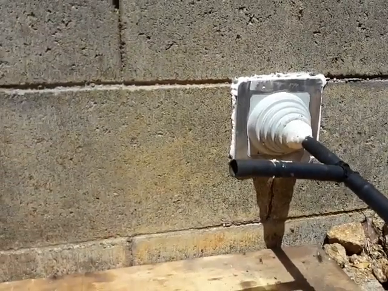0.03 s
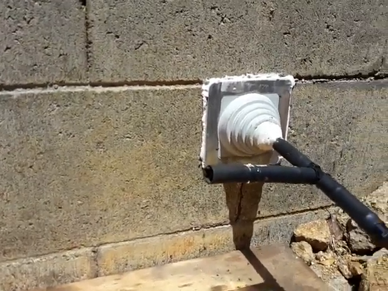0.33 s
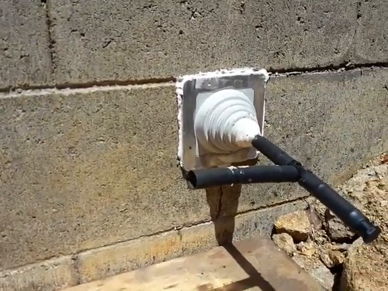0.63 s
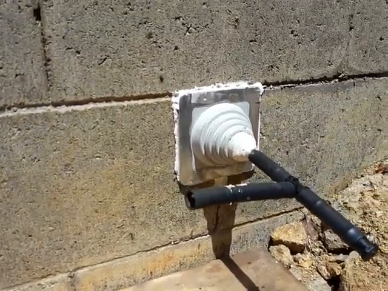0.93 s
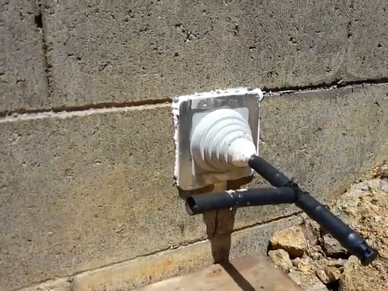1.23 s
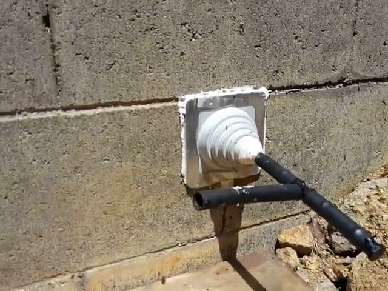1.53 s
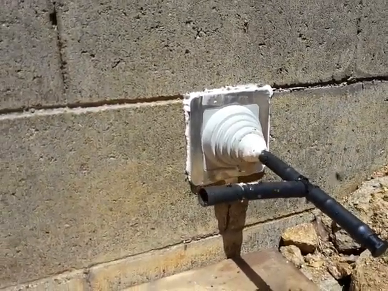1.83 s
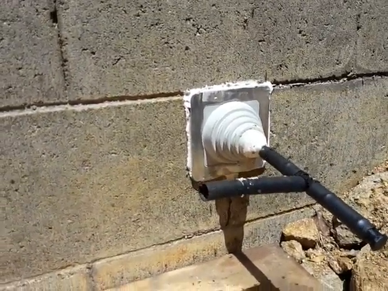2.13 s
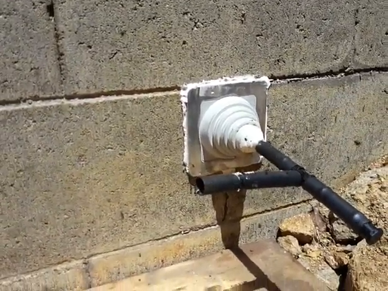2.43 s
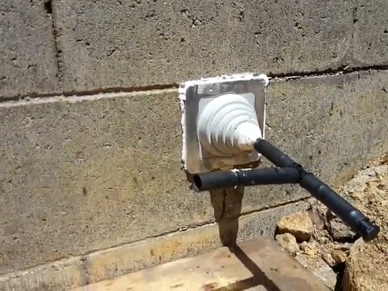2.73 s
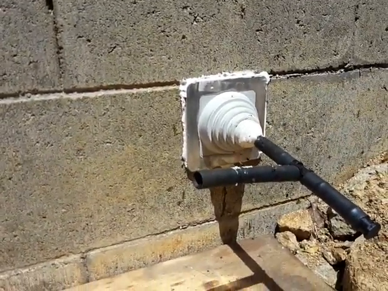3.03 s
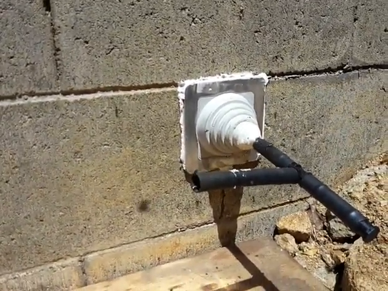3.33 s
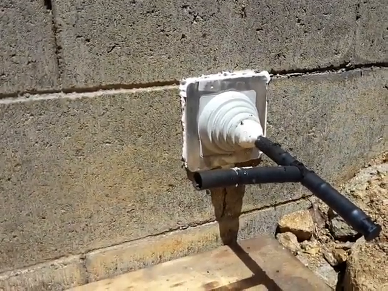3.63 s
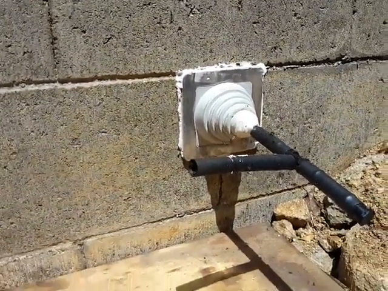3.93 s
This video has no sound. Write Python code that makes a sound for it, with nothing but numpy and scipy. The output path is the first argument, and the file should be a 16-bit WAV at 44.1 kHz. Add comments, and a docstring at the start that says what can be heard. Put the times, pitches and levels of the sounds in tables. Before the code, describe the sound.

Wind buffets a hand-held microphone outdoors, with low thumps on the right, strongest until 1.4 seconds. Dull handling knocks come at 0.2 seconds and between 1.2 and 2.3. A faint distant engine rises in pitch, loudest near 2.5. A small bee buzzes softly past on the right from 2.6 to 3.2. The wind dies down, and a sharp knock lands at 3.9. Faint hiss and low hum continue throughout.

```python
"""Stingless bees hover at a pipe in an outdoor wall, heard on a hand-held camera.
From the start, wind buffets the ports and handling knocks the case. Near 2.5 s a distant engine,
gathering speed, is at its loudest. One bee then weaves close to the right port and moves off by 3.2 s.
The wind dies down; at 3.9 s come the sharpest knock and a handling bump on the left.
Throughout: outdoor air, mains hum, a thin whine and the recorder's hiss."""
import sys
import numpy as np
from scipy import signal
from scipy.fft import rfft, irfft
from scipy.io import wavfile
from scipy.ndimage import uniform_filter1d

SR = 44100
rng = np.random.default_rng(int(sys.argv[2]) if len(sys.argv) > 2 else 0)


def master_out(mix):
    """Clip the mix to full scale and print it as 16-bit PCM to the path in sys.argv[1]."""
    frames = np.transpose(np.atleast_2d(mix))
    ceiling = np.clip(frames, -1, 1)
    pcm = np.round(ceiling * 32767).astype(np.int16)
    wavfile.write(sys.argv[1], SR, pcm)


N = 176400
TIME_S = np.arange(N) / SR

# Near bee. Each row: time in seconds, wingbeat in Hz, level in dB.
BEE_FLIGHT = [(2.54, 212, -70), (2.615, 239, -52), (2.665, 250, -47.5), (2.705, 237, -50),
              (2.737, 213, -54), (2.795, 239, -47), (2.86, 223, -57), (2.885, 243, -55), (2.92, 251, -49),
              (2.95, 230, -49), (3.01, 211, -52.5), (3.06, 232, -52), (3.09, 230, -53), (3.125, 249, -52),
              (3.18, 231, -56), (3.225, 228, -71)]
# Brightness as the bee turns. Each row: time in seconds, lift of its octave in dB.
BEE_OCTAVE_LIFT = [(2.68, -6.5), (2.81, -2), (2.88, -3), (2.96, 1.5), (3.05, -.5), (3.17, 8)]
# Wing tone. Each row: frequency in Hz, gain in dB.
WING_SPECTRUM = [(230, 0), (470, -5), (720, -10.5), (960, -17), (1200, -18), (1500, -25), (2500, -35),
                 (5000, -31)]
# Bees hovering at the entrance. Each row: wingbeat in Hz, level in dB.
HOVERING_BEES = [(240.4, -77.5), (230.8, -70.5)]

# Turbulence at the left and right ports. Each row: time in seconds, level in dB.
WIND_LEFT_LEVEL = [(0, -54), (.3, -45.5), (.65, -51), (1.3, -77), (1.7, -47.5), (2.3, -44.5), (2.7, -47),
                   (4, -63)]
WIND_RIGHT_LEVEL = [(0, -44), (.15, -30.5), (.24, -35), (.5, -33), (.65, -41), (.85, -34), (1.0, -33),
                    (1.15, -35.5), (1.35, -36), (1.5, -45), (1.95, -38.5), (2.05, -43), (2.32, -35.5),
                    (2.43, -44), (2.8, -44), (3.32, -49), (3.6, -62)]
# Turbulence. Each row: frequency in Hz, relative density in dB.
WIND_SPECTRUM = [(20, -37), (45, -3.5), (70, 4.5), (100, 5), (150, -2.5), (220, -10), (320, -21),
                 (600, -33.5), (1500, -53.5)]
# Low thumps at the ports: wind eddies on the right, then one handling bump on the left at 3.9 s.
# Each row: centre in seconds, level in dB, frequency in Hz, half length in cycles, port.
PORT_THUMPS = [(0.087, -19, 143, 0.64, "R"), (0.13, -14, 152, 0.47, "R"), (0.174, -15, 132, 0.52, "R"),
               (.195, -17, 166, 1.3, "R"), (0.274, -21.5, 128, 0.87, "R"), (0.426, -26, 103, 3.1, "R"),
               (.469, -14, 125, 0.44, "R"), (0.492, -22, 167, 0.58, "R"), (0.555, -16, 187, 0.68, "R"),
               (.598, -17, 137, 0.63, "R"), (.732, -22.5, 109, 0.63, "R"), (0.858, -24, 155, 1.2, "R"),
               (.909, -19, 154, .6, "R"), (0.931, -19, 123, 0.96, "R"), (0.982, -18.5, 107, 1.37, "R"),
               (1.019, -25, 180, 3.1, "R"), (1.066, -22.5, 148, 1.5, "R"), (1.121, -17.5, 92, 0.79, "R"),
               (1.186, -18, 122, 0.63, "R"), (1.331, -20.5, 121, 0.5, "R"), (1.412, -16.5, 149, .6, "R"),
               (1.81, -26.5, 128, 0.46, "R"), (1.86, -21.5, 139, 1.22, "R"), (2.156, -23, 187, 0.79, "R"),
               (2.198, -19, 103, 0.82, "R"), (2.383, -17, 121, 0.48, "R"), (3.322, -28, 98, 0.48, "R"),
               (3.925, -27.5, 99, 0.82, "L")]

# Knocks on the case. Each row: start in seconds, level in dB, crack against thud in dB,
# crack cutoff in Hz, thud left minus right in dB.
CASE_KNOCKS = [(0.2111, -26, -25, 1900, 7), (0.91, -47, -8, 2200, 13), (1.2017, -33, -24, 1890, 3),
               (1.7029, -33.5, -19, 2190, 5), (1.806, -36, -21, 1500, 4), (1.8952, -25, -26, 1400, 6),
               (2.0405, -24.5, -22.5, 1720, 6), (2.203, -37, -21, 1800, 1), (2.316, -43, -13, 4000, 3),
               (2.3242, -26.5, -26, 1700, 4), (3.8936, -38, -10.5, 14000, 2), (3.9032, -22.5, -20, 4540, 2)]
# Thud of the hollow case and crack of the contact. Each row: frequency in Hz, gain in dB.
THUD_SPECTRUM = [(60, -20), (150, -1), (245, -4), (385, 2.5), (460, -.5), (560, 2), (790, -7.5), (950, -12),
                 (1200, -19), (1500, -22.5), (2000, -37), (5000, -68)]
CRACK_SPECTRUM = [(300, 4), (1300, 7), (2200, -0.5), (3600, -3), (6000, -8.5), (8500, -13), (11000, -2.5),
                  (15000, -7)]
# Fingers on the case. Each row: centre in seconds, half length in seconds, level in dB,
# grit against swish in dB.
FINGER_BRUSHES = [(1.81, 0.013, -56.5, -6), (2.137, .008, -54.5, -7), (3.4, 0.05, -63, -9),
                  (3.925, 0.009, -64, 15)]
# Swish of skin. Each row: frequency in Hz, relative density in dB.
SWISH_SPECTRUM = [(7000, -24), (11500, 25), (15000, -5.5)]

# Distant engine. Each row: time in seconds, firing rate in Hz, level in dB.
ENGINE_RUN = [(0, 119.8, -84), (1.6, 122.8, -53.5), (2.25, 129, -47), (2.48, 133.9, -40.5),
              (2.7, 137.5, -44), (2.87, 143, -50.5), (3.1, 150.6, -50.5), (3.45, 160, -60),
              (4, 167.3, -67.5)]
# Outdoor air and recorder hiss. Each row: frequency in Hz, relative density in dB.
AIR_SPECTRUM = [(20, -25), (50, 0.5), (90, 1), (135, 2.5), (190, -24.5), (290, -20), (500, -19.5),
                (800, -29.5), (1500, -30.5), (3000, -35), (6000, -40.5), (15000, -48)]
HISS_SPECTRUM = [(1000, -1), (4500, -11), (6200, -16.5), (8000, -15), (9300, -8.5), (10700, -0.5),
                 (12200, -1.5), (13500, -3), (15700, -5.5)]
# Thin whine. Each row: frequency in Hz, level in dB, left minus right in dB.
WHINE_TONES = [(1607, -74, -16), (2410, -82, -12)]
# Recorder hiss. Each row: time in seconds, level in dB.
HISS_ENVELOPE = [(0, -55), (1.6, -55.5), (2.7, -54.5), (3.25, -56.5), (4, -59.5)]


def bees(near_pan_db=-26, hover_swell_db=4.5, hover_wander=.028):
    """One bee swerves past the right port; others hover further off."""
    near = wings(curve(BEE_FLIGHT), curve(BEE_OCTAVE_LIFT))
    out = pan(near_pan_db) * undb(curve(BEE_FLIGHT, column=2)) * near
    for beat_hz, db in HOVERING_BEES:
        gain = undb(db + hover_swell_db * drift(3.74))
        out += gain * wings(beat_hz * (1 + hover_wander * drift(5)), lift_db=-1.5)
    return out


def wings(beat_hz, lift_db, jitter=.018, flutter_db=2.8):
    """Fluttering harmonics of an unsteady wingbeat. The octave gets the full lift, higher ones half."""
    beat_hz = beat_hz * (1 + jitter * drift(130))
    phase = running_phase(beat_hz)
    out = np.zeros(N)
    for k in range(1, 19):
        lift_share = (k == 2) + (k > 2) / 2
        gain = gain_at(k * beat_hz, WING_SPECTRUM) * undb(lift_db * lift_share + flutter_db * drift(45))
        out += gain * np.sin(k * phase + 2 * np.pi * rng.random())
    return out


def wind(gust_db=2.6, gust_hz=24):
    """Separate turbulence at each port."""
    return np.array([undb(curve(level) + gust_db * drift(gust_hz)) * noise(WIND_SPECTRUM)
                     for level in (WIND_LEFT_LEVEL, WIND_RIGHT_LEVEL)])


def thumps(octave_gain=.17):
    """Brief low pulses: wind eddies at the right port, one handling bump at the left."""
    out = np.zeros((2, N))
    t = np.arange(-SR // 20, SR // 20) / SR
    for centre_s, db, hz, half_cycles, port in PORT_THUMPS:
        swell = np.exp(-(t * hz / half_cycles) ** 2)
        phase = 2 * np.pi * (hz * t + rng.random())
        thump = undb(db) * swell * (np.cos(phase) + octave_gain * swell * np.sin(2 * phase))
        add(out[int(port == "R")], centre_s + t[0], thump)
    return out


def knocks(crack_pan_db=-52, left_lag_s=.00036, rattle_gain=.014, rattle_decay_s=.005, size=2048):
    """Each contact cracks, mostly at the nearer right port; the hollow case thuds and rattles."""
    out = np.zeros((2, N))
    t = np.arange(size) / SR
    hz = np.arange(size // 2 + 1) * SR / size
    thud_peak = abs(impulse_response(gain_at(hz, THUD_SPECTRUM))).max()
    median_cutoff_hz = np.median([row[3] for row in CASE_KNOCKS])
    for start_s, db, crack_db, cutoff_hz, pan_db in CASE_KNOCKS:
        pitch_ratio = (cutoff_hz / median_cutoff_hz) ** .075  # harder contacts sound higher
        thud = impulse_response(gain_at(hz / pitch_ratio, THUD_SPECTRUM))
        rolloff = np.hypot(1, (hz / cutoff_hz) ** 2.3)  # about 14 dB per octave
        crack = impulse_response(undb(crack_db) * gain_at(hz, CRACK_SPECTRUM) / rolloff)
        responses = pan(pan_db) * thud + pan(crack_pan_db) * crack
        for channel, response, lag_s in zip(out, responses, (left_lag_s, 0)):
            rattle = rattle_gain * rng.standard_normal(size) * np.exp(-t / rattle_decay_s)
            contact = undb(db) / thud_peak * ((t == 0) + rattle)
            add(channel, start_s + lag_s, signal.fftconvolve(response, contact))
    return out


def brushes():
    """Short swishes of skin on the case; the last is gritty."""
    out = np.zeros((2, N))
    swish, grit = stereo_noise(SWISH_SPECTRUM), stereo_noise(CRACK_SPECTRUM)
    for centre_s, half_s, db, grit_db in FINGER_BRUSHES:
        swell = np.exp(-((TIME_S - centre_s) / half_s) ** 2)
        out += undb(db) * swell * (swish + undb(grit_db) * grit)
    return out


def engine(half_order_db=-22, pan_db=-1.5):
    """A far engine climbs in pitch; only its firing note and a weak half order carry."""
    phase = running_phase(curve(ENGINE_RUN) * (1 + .0084 * drift(16)))
    note = np.sin(phase) + undb(half_order_db) * np.sin(1.5 * phase)
    return pan(pan_db) * undb(curve(ENGINE_RUN, column=2) + .5 * drift(3.2)) * note


def air(level_db=-50, pan_db=-2.5, shared_power=.17):
    """Low rush of outdoor air, partly common to both ports."""
    common = np.sqrt(shared_power) * noise(AIR_SPECTRUM)
    separate = np.sqrt(1 - shared_power) * stereo_noise(AIR_SPECTRUM)
    return pan(pan_db) * undb(level_db) * (common + separate)


def mains_hum(hz=100, level_db=-54, pan_db=-3):
    """One steady low tone."""
    return pan(pan_db) * undb(level_db) * np.sin(running_phase(hz))


def whine(flicker_hz=30.2):
    """Two faint high tones that flicker in level."""
    return sum(pan(pan_db) * undb(db + drift(flicker_hz)) * np.sin(running_phase(hz))
               for hz, db, pan_db in WHINE_TONES)


def hiss(flicker_db=.5, flicker_hz=22.82):
    """Recorder noise, separate in each channel."""
    return undb(curve(HISS_ENVELOPE) + flicker_db * drift(flicker_hz)) * stereo_noise(HISS_SPECTRUM)


def undb(db):
    """Decibels to gain."""
    return 10 ** (np.asarray(db) / 20)


def curve(rows, column=1):
    """One table column, interpolated linearly in time."""
    rows = np.array(rows)
    return np.interp(TIME_S, rows[:, 0], rows[:, column])


def pan(db):
    """Channel gains for a left minus right level."""
    gains = undb([[db / 2], [-db / 2]])
    return gains / np.sqrt(np.mean(gains ** 2))


def gain_at(hz, spectrum):
    """Gain of a spectrum, interpolated in log frequency."""
    points_hz, db = np.array(spectrum).T
    return undb(np.interp(np.log(hz + 1e-3), np.log(points_hz), db))


def noise(spectrum):
    """Unit-RMS noise with a given spectrum."""
    hz = np.arange(N // 2 + 1) * SR / N
    x = irfft(rfft(rng.standard_normal(N)) * gain_at(hz, spectrum), N)
    return x / x.std()


def stereo_noise(spectrum):
    """Independent noise in each channel."""
    return np.array([noise(spectrum), noise(spectrum)])


def drift(rate_hz):
    """Smooth random drift of unit spread."""
    step = int(SR / rate_hz)
    held = rng.standard_normal(1024)[np.arange(N) // step % 1024]
    x = uniform_filter1d(uniform_filter1d(held, step), step)
    return x / x.std()


def running_phase(hz):
    """Phase in radians of a steady or moving frequency, from a random start."""
    return 2 * np.pi * (np.cumsum(hz * np.ones(N)) / SR + rng.random())


def impulse_response(gain):
    """Minimum-phase response for gains from 0 Hz to SR / 2."""
    cepstrum = irfft(np.log(gain))
    half = len(gain) - 1
    cepstrum[1:half] *= 2
    cepstrum[half + 1:] = 0
    return irfft(np.exp(rfft(cepstrum)))


def add(channel, start_s, sound):
    """Mix a short sound into one channel."""
    i = max(int(start_s * SR), 0)
    channel[i:i + len(sound)] += sound[:max(N - i, 0)]


def scene():
    """All sources, left and right."""
    foreground = bees() + wind() + thumps() + knocks() + brushes()
    return foreground + engine() + air() + mains_hum() + whine() + hiss()


def record(dry, cutoff_hz=15680):
    """The recorder's steep low-pass."""
    return signal.sosfilt(signal.ellip(12, .1, 80, cutoff_hz, fs=SR, output="sos"), dry)


dry = scene()
out = record(dry)
master_out(out)
```